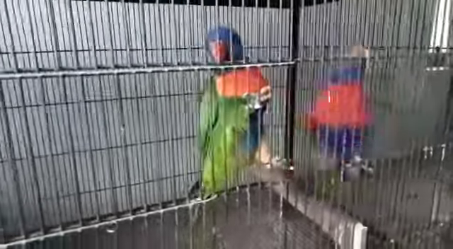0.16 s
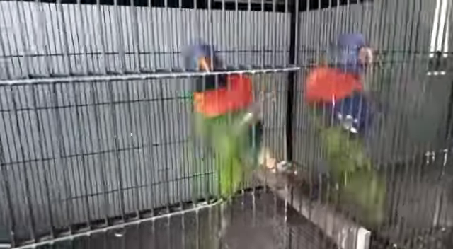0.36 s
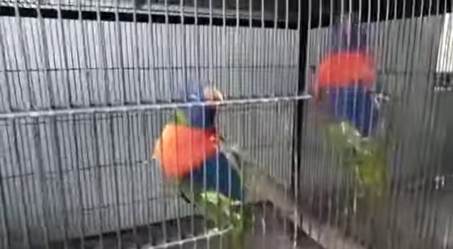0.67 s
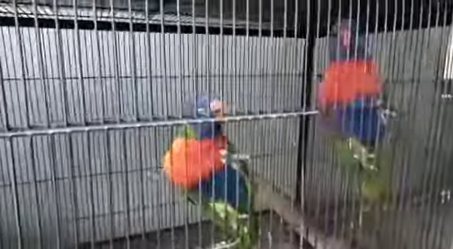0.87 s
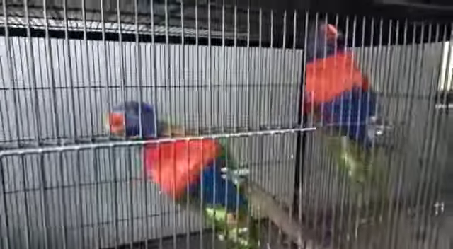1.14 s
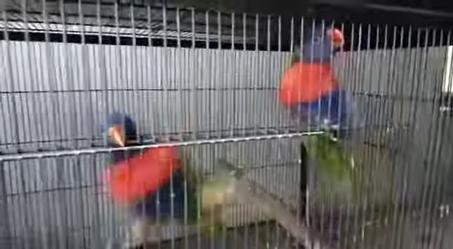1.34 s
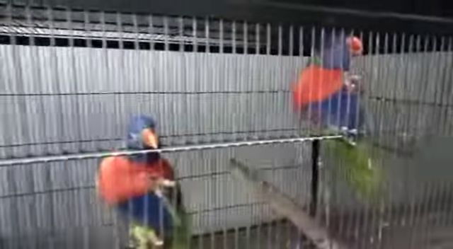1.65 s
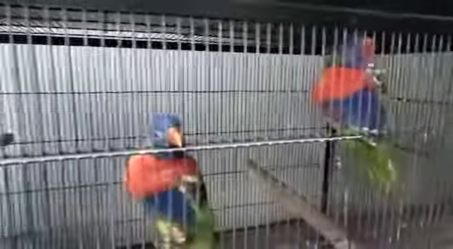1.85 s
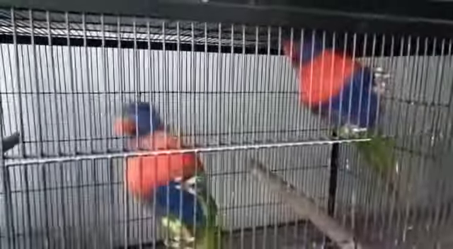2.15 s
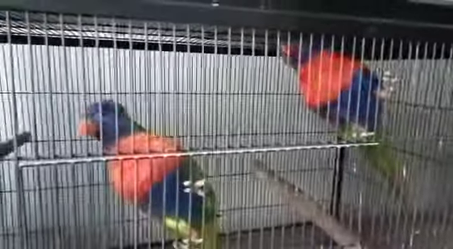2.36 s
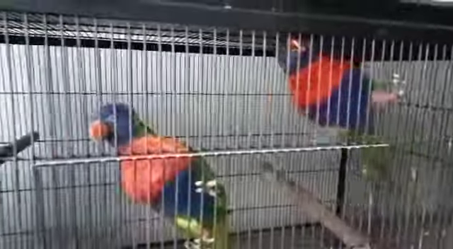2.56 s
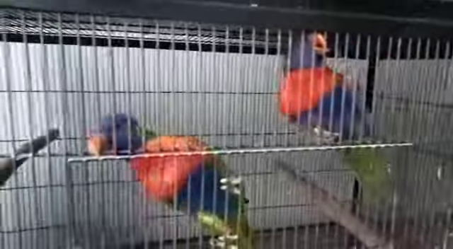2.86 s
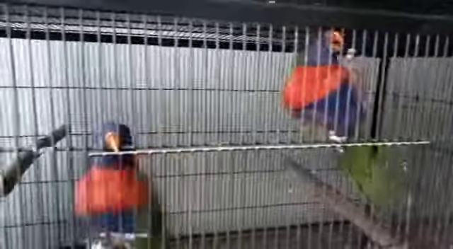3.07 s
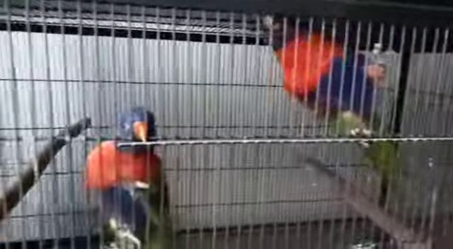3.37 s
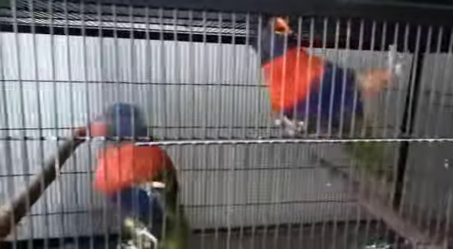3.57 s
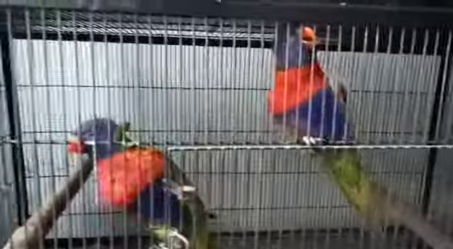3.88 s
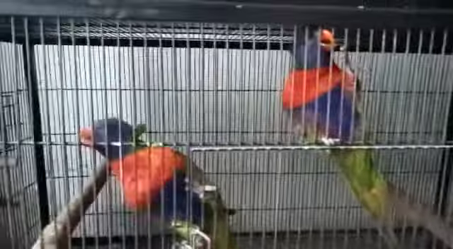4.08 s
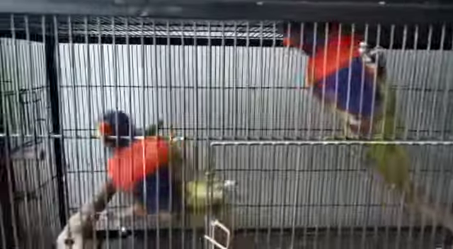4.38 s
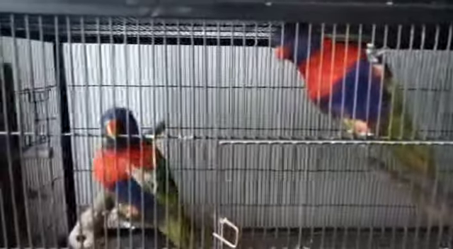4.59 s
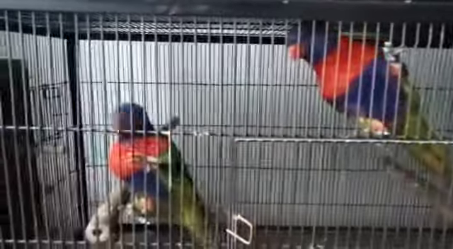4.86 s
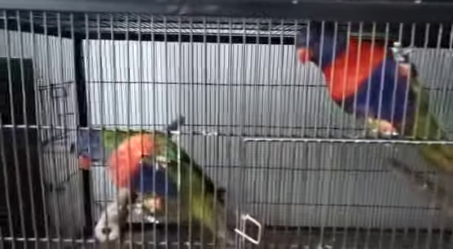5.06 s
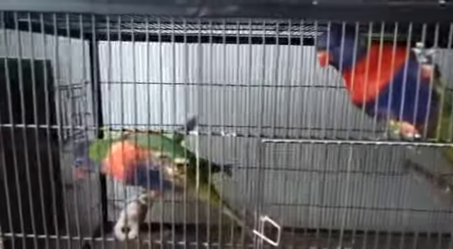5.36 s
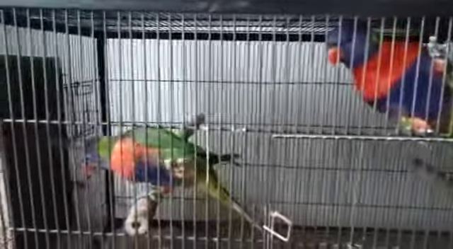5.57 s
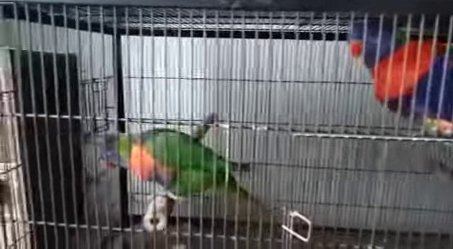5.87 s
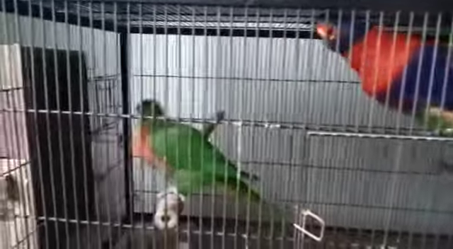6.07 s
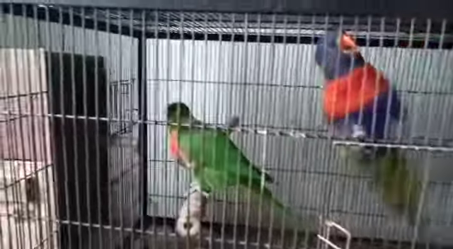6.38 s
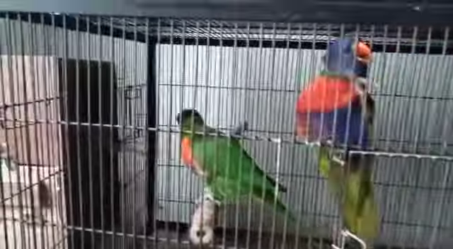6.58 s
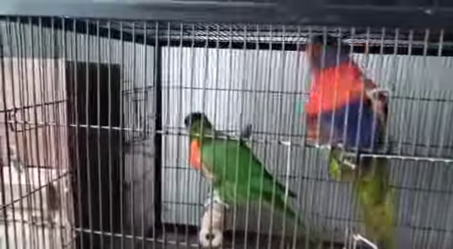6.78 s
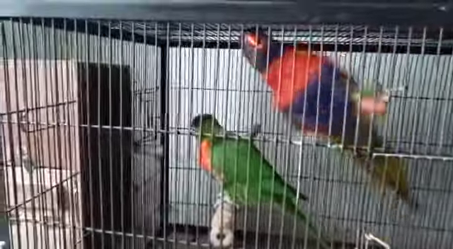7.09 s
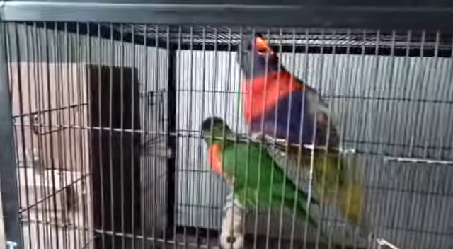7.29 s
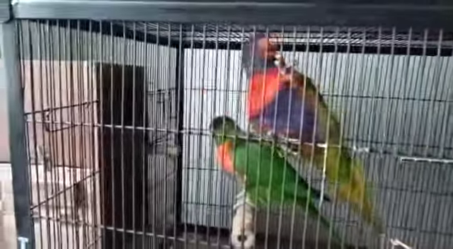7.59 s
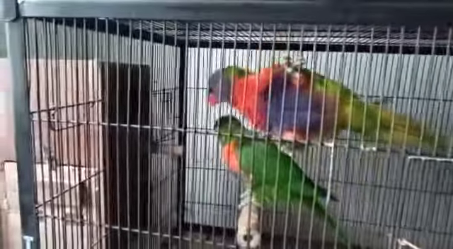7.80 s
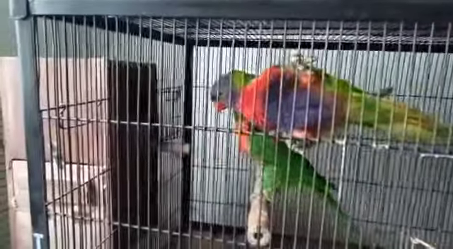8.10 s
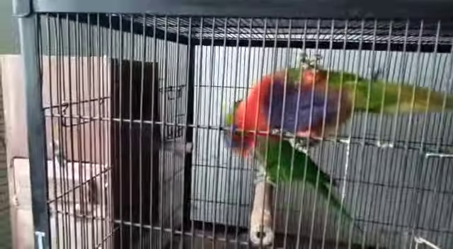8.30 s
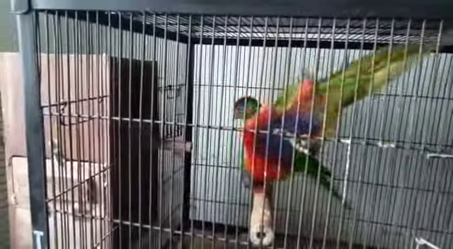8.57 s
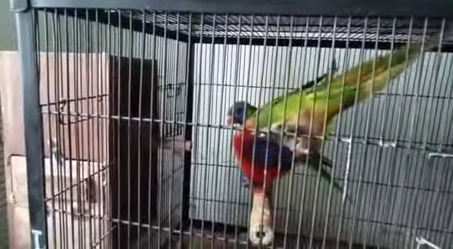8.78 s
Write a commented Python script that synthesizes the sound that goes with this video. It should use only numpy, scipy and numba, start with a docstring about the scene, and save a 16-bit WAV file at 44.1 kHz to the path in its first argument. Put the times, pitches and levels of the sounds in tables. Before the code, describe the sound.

Lorikeets screech harshly in a wire cage, with claws ticking on the mesh and feathers rustling over a faint hum.

```python
"""Lorikeets in a wire aviary with sheet-metal walls. A motor hums far off under a steady rush of air.
Feathers rustle, claws tick on the mesh, then the birds screech, often two at once: each call is a stack
of tones near 2 kHz, trilled and roughened by the syrinx, a bird's voice box. From 2 to 5 s there is
mostly ticking and rustling, then the screeches return, and two weaker calls and a rustle end the scene.
All along, the microphone's gain control pulls the background down under the loud calls."""
import sys
import numpy as np
from scipy import signal
from scipy.fft import rfft, irfft, next_fast_len
from scipy.io import wavfile
from scipy.ndimage import uniform_filter1d
from numba import njit

SR = 44100
rng = np.random.default_rng(int(sys.argv[2]) if len(sys.argv) > 2 else 0)


def dump(signal):
    """Clip the signal to [-1, 1] and save it as 16-bit WAV at the path in sys.argv[1]."""
    limited = np.clip(np.atleast_2d(signal).T, -1, 1)
    pcm = np.round(limited * 32767).astype(np.int16)
    wavfile.write(sys.argv[1], SR, pcm)


N = 394254


def undb(db):
    """Turns decibels into a number to multiply by."""
    return 10 ** (np.asarray(db) / 20)


def unit(x):
    """Scales a signal to an average (rms) size of 1."""
    return x / np.sqrt(np.mean(x ** 2))


def colour(table, hz):
    """Looks up the gain at hz in a table of frequency_hz, level_db."""
    table_hz, table_db = np.array(table).T
    return undb(np.interp(np.log(hz + 1), np.log(table_hz), table_db))


def noise(table, size):
    """Noise of rms 1, shaped by a table of frequency_hz, level_db."""
    n = next_fast_len(size)
    spectrum = rfft(rng.standard_normal(n)) * colour(table, np.arange(n // 2 + 1) * SR / n)
    return unit(irfft(spectrum, n)[:size])


def wander(rate_hz, size):
    """A smooth random wobble of rms 1."""
    width = int(SR / rate_hz)
    return unit(uniform_filter1d(uniform_filter1d(rng.standard_normal(size), width), width))


def add(out, start_s, x):
    """Mixes x into out from start_s on."""
    i = int(start_s * SR)
    out[i:i + len(x)] += x[:N - i]


# The tone of the distant rush: frequency_hz, level_db
AIR_TONE = [(15, -63), (25, -56), (63, -20), (242, -8.5), (293, -11), (427, -7.5), (734, -12.5),
            (863, -10.5), (1520, -19.5), (1940, -18.5), (3430, -23), (4870, -42.5), (7110, -40),
            (16000, -52)]
def air():
    """A soft, distant rush that swells a little."""
    return undb(-44.5 + 0.64 * wander(0.23, N)) * noise(AIR_TONE, N)


# The motor's tones: pitch_hz, level_db, drift_hz
MOTOR_TONES = [(428.4, -53, 3.98), (613, -60.5, 6.8), (847, -50.5, 2.07), (1290, -62, 7.3)]
def motor():
    """A far-off motor hums, each tone wavering in pitch and loudness."""
    out = np.zeros(N)
    for pitch_hz, level_db, drift_hz in MOTOR_TONES:
        level = undb(level_db + 2 * wander(10, N))
        hz = pitch_hz + drift_hz * wander(15.2, N)
        out += np.sqrt(2) * level * np.sin(np.cumsum(2 * np.pi * hz / SR))
    return out


# Stirs of feathers and feet: peak_s, level_db, fall_s (time to fade by 20 dB)
STIRS = [(0.0, -40, .14), (0.248, -43.5, 0.2), (2.1, -45.5, 0.29), (2.71, -53.5, .5), (2.97, -52, 0.1),
         (3.16, -42.5, 0.12), (3.32, -42, 0.16), (3.7, -38.5, 0.28), (3.82, -39, 0.17), (4.02, -40.5, 0.09),
         (4.58, -57.5, 0.66), (4.95, -57, .1), (6.55, -44.5, 0.54), (7.613, -52, 0.05), (8.322, -55, .5),
         (8.819, -36, 0.28), (8.92, -32.5, 0.05)]
def rustle():
    """Feathers and feet make a grainy hiss; each stir rises twice as fast as it fades."""
    hiss = noise([(800, -10.5), (3200, 7.5), (5100, -9), (7200, 4), (10000, -17), (15000, -13)], N)
    grain = undb(2 * wander(55, N))
    t = np.arange(N) / SR
    level = sum(undb(level_db - 20 * np.maximum(2 * (peak_s - t), t - peak_s) / fall_s)
                for peak_s, level_db, fall_s in STIRS)
    return hiss * grain * level


# The tones of one ringing wire: multiple (of wire_hz), level_db
WIRE_TONES = [(.58, -13), (1, -6.5), (1.27, -5), (1.5, -1.5), (2.129, 1.5), (2.6, -5.5), (2.73, 11.5)]
# Claws and beaks hitting the mesh: start_s, level_db, ring_s, wire_hz, ring_db (added to level_db)
CLAW_TICKS = [(0.148, -27.5, 0.29, 6470, -24), (0.2085, -31, 0.091, 6320, -24),
              (0.2399, -42, .15, 6320, -24), (2.081, -74, .2, 6030, -28), (2.3915, -41, .14, 5960, -27),
              (2.5498, -30, 0.24, 6100, -29), (2.6462, -37.5, .35, 5600, -2),
              (2.715, -31.5, 0.44, 6320, -18), (2.9682, -35, .15, 6170, -20), (3.0894, -42, .15, 5970, -16),
              (3.142, -29, .2, 6200, -28), (3.2995, -31, 0.13, 5970, -26), (3.395, -36, 0.16, 6060, -13),
              (3.59, -36, 0.16, 5800, -15), (3.6565, -29, 0.39, 6470, -18), (3.784, -16, .2, 6400, -23),
              (3.8503, -29, .15, 6410, -16), (3.8985, -18, .15, 6700, -17), (4.2482, -40, 0.43, 5330, -20),
              (4.3974, -40, 0.25, 6290, -18), (4.476, -33.5, 0.97, 5730, -15),
              (4.539, -27.5, 0.33, 6490, -28), (4.952, -45, .15, 6430, -24), (7.603, -43, .15, 6270, -17),
              (8.184, -43.5, .14, 6100, -17.5)]
def mesh_ticks():
    """Each hit makes a crack, then the wire rings and the mesh rattles."""
    out, t = np.zeros(N), np.arange(SR // 2) / SR
    rattle_tone = [(1500, -22), (3500, 8.5), (5100, -7), (7200, 15.5), (11000, -8), (15000, 6)]
    for start_s, level_db, ring_s, wire_hz, ring_db in CLAW_TICKS:
        ring = 0
        for multiple, tone_db in WIRE_TONES:
            hz = min(multiple * wire_hz, 15600)
            ring += undb(tone_db + 4 * wander(80, len(t))) * np.sin(2 * np.pi * hz * t)
        rattle = noise(rattle_tone, len(t))
        crack = .5 * np.exp(-t / 0.00054) * rattle
        tail = undb(-60 * t / ring_s) * (undb(ring_db) * unit(ring) + 0.23 * rattle)
        add(out, start_s, undb(level_db) * (crack + tail))
    return out


# The tone of the calls as heard through the microphone, bright near 3-4 and 7 kHz, hollow near 5 kHz:
# frequency_hz, gain_db
CALL_TONE = [(500, -51), (1200, -11), (2100, -4.5), (3000, 3.5), (4000, 0.5), (5100, -14.5), (6300, -8.5),
             (7400, 0), (9000, -21), (10500, -21.5), (12300, -33), (15000, -23), (16500, -41.5)]
def syrinx(hz, rough, half_db, breath_db, tilt_db):
    """The voice box buzzes with a stack of tones; a hoarse one adds flutter and breath."""
    phase = np.cumsum(np.pi * hz / SR)  # runs at half the pitch, so k = 2 is the pitch itself
    voice, power = 0, 0
    for k in range(1, 24):
        tone_hz = k * hz / 2
        gain = colour(CALL_TONE, tone_hz) * (tone_hz < .38 * SR) * undb(tilt_db * np.log2(k / 4))
        gain *= undb(3.5 * (k == 4))  # the open beak favours twice the pitch
        # closing harder every second cycle adds the odd, in-between tones
        gain *= undb(half_db * (1.5 - rough / 2) * (k % 2))
        flutter = undb(5.5 * rough * wander(470, len(hz)))
        slip = .6 * np.sqrt(k) * rough * wander(580, len(hz))  # high tones slip out of step more
        voice += gain * flutter * np.cos(k * phase + k * k + slip)
        power += gain ** 2 / 2
    breath = undb(breath_db) * rough ** 2 * noise(CALL_TONE, len(hz))
    return unit(voice / np.sqrt(power)) + breath


def beak_puffs(beats):
    """Gusts from the beak hit the microphone as dull thumps, one a beat, each its own size."""
    beat = beats % 1
    strength = undb(3.8 * rng.standard_normal(64))[beats.astype(int)]
    gust = strength * (0.13 + 4 * beat * np.exp(1 - beat / 0.085))
    gust *= 1 + 4.3 * noise([(100, -1.5), (300, -7), (900, -10.5), (2500, -5.5)], len(beats))
    return unit(signal.sosfilt(signal.butter(3, [72.4, 900], "bandpass", fs=SR, output="sos"), gust))


LEAD_RISE_HZ_PER_S, LEAD_RISE_DB, JUMP_HZ_PER_S, SHORTEST_JUMP_S = 2300, 6.5, 22000, .012
PUFF_RISE_DB_PER_S, PUFF_FALL_DB_PER_S = 334, 650.5
ATTACK_S, RELEASE_S = 0.011, 0.006
def screech(row, lead_rough, body_rough, lead_throb):
    """One call: a hoarse lead-in jumps to the main body, swells and fades. Returns voice and puffs."""
    lead_s, swell_s, fade_s, lead_hz, first_hz, middle_hz, last_hz = row[:7]
    lead_db, first_db, crest_db, last_db, puff_db = row[7:12]
    trill_hz, swing, body_throb, half_db, breath_db, tilt_db = row[12:]
    crest_s = lead_s + swell_s
    end_s = crest_s + fade_s
    t = np.arange(0, end_s, 1 / SR)

    rising_hz = lead_hz + LEAD_RISE_HZ_PER_S * np.minimum(t, lead_s)
    jump_s = max(abs(first_hz - rising_hz[-1]) / JUMP_HZ_PER_S, SHORTEST_JUMP_S)
    body_s = lead_s + min(jump_s, .9 * swell_s)
    jump = np.interp(t, [lead_s, body_s], [0, 1])  # 0 in the lead-in, 1 in the body
    progress = np.clip((t - body_s) / (end_s - body_s), 0, 1)
    arch = 1 - abs(2 * progress - 1) ** 3  # a flat-topped curve
    body_hz = first_hz + (last_hz - first_hz) * progress + (middle_hz - (first_hz + last_hz) / 2) * arch
    hz = (1 - jump) * rising_hz + jump * body_hz
    hz *= 1 - .08 * np.clip(1 - (end_s - t) / .018, 0, 1)  # the pitch sags as the air runs out

    db = np.interp(t, [0, lead_s, body_s, crest_s, end_s],
                   [lead_db - LEAD_RISE_DB, lead_db, first_db, crest_db, last_db])
    puff_db -= np.maximum(PUFF_RISE_DB_PER_S * (crest_s - t), PUFF_FALL_DB_PER_S * (t - crest_s))
    hz, db, puff_db = (uniform_filter1d(curve, 400, mode="nearest") for curve in (hz, db, puff_db))

    # every beat of the trill opens the airflow and sweeps the pitch up
    beats = np.cumsum(trill_hz * (1 + 0.057 * wander(40, len(t))) / SR)
    beat = beats % 1
    throb = lead_throb + (body_throb - lead_throb) * jump
    sharpness = 2.5 - 1.5 * jump
    airflow = (1 - throb * np.cos(np.pi * beat) ** 2) ** sharpness
    rough = lead_rough + (body_rough - lead_rough) * jump
    jitter = .035 * rough ** 2 * wander(900, len(t))
    hz *= 1 + swing * (2 * beat - 1) + jitter

    voice = undb(db) * unit(airflow) * syrinx(hz, rough, half_db, breath_db, tilt_db)
    voice_fade = np.clip(np.minimum(t / ATTACK_S, (end_s - t) / RELEASE_S), 0, 1)
    puff_fade = np.clip(np.minimum(t, end_s - t) / .02, 0, 1) ** 2
    return voice_fade * voice, puff_fade * undb(puff_db) * beak_puffs(beats)


# The calls, one a row: start_s, lead_s, swell_s, fade_s, lead_hz, first_hz, middle_hz, last_hz,
# lead_db, first_db, crest_db, last_db, puff_db, trill_hz, swing (share of the pitch),
# body_throb (0 steady to 1 pulsing), half_db (in-between tones) and breath_db (both at full roughness),
# tilt_db (per octave). "Lead" is the lead-in; "first", "middle" and "last" belong to the body.
CALLS = [ (0.384, 0.023, 0.16, 0.029, 1375, 1952, 1912, 1948, -6, -6.5, -3.5, -14, -23, 68.8, 0.053, 0.1, -12.5, -17, 2.5),
         (0.6, 0.07, 0.035, 0.028, 1438, 1745, 1793, 1740, -14, -7.5, -9.5, -21, -74, 71.5, 0.0039, 0.26, -23, -17, 0),
         (0.808, 0.041, .018, 0.023, 1239, 1346, 1353, 1360, -11, -11, -11.5, -15, -45.5, 79, 0.047, .6, -16, 8, .5),
         (0.89, 0.013, 0.071, 0.02, 1945, 2060, 2047, 2173, -5.5, -14, -10, -23, -23.5, 69, 0.01, .2, -9.5, -11, 3.5),
         (0.895, 0.042, 0.031, 0.019, 1567, 1753, 1818, 1855, -6, -0.5, -3.5, -9.5, -20.5, 59.2, 0.0038, .33, -28, -7, 4.5),
         (1.0, .002, .018, 0.029, 2520, 2365, 2043, 1860, -10, -6, -9.5, -17.5, -33, 67.8, .0034, .097, -26.5, -20.5, 6),
         (1.075, 0.056, .085, .02, 1507, 2087, 2164, 1993, -9, -4, -5.5, -0.5, -12, 69.15, 0.01, 0, -28, 0.5, 5),
         (1.343, .052, .026, 0.16, 3008, 3143, 3062, 3090, -4, -7.5, -4.5, -20.5, -47, 66.2, 0.003, .4, -31, -0.5, -1.5),
         (1.43, 0.028, .11, 0.019, 2005, 2241, 2165, 2073, -6.5, -9, -7, -9, -35.5, 98.7, 0.041, 0.48, -10, -23, 3.5),
         (1.578, 0.0059, 0.16, 0.078, 2103, 2284, 2082, 1905, -1, -3.5, -3, -10, 1.5, 97.6, 0.028, 0.34, -9.5, -1, 3.5),
         (3.66, 0.0077, .148, 0.072, 2525, 2543, 2563, 2573, -37, -40, -33, -40, -42, 61.4, .0023, 0.2, -30, -3, 7.5),
         (3.9, .024, 0.049, 0.084, 2560, 2525, 2530, 2560, -36, -37, -28, -40.5, -51, 60.7, .0023, 0.26, -28, -1, 6.5),
         (5.098, 0.052, 0.029, 0.031, 1256, 1720, 1685, 1636, -17, -13, -9, -15.5, -42, 58.7, 0.033, 0.7, -6, 0, -4.5),
         (5.371, 0.053, 0.091, 0.088, 1568, 2013, 1928, 1806, -7.5, -6, -8, -12.5, -23.5, 63.36, .077, 0.33, -7, -4.5, 3.5),
         (5.699, .046, .114, 0.041, 1462, 1894, 1963, 1905, -13, -4, -1, -8, -9.5, 58.25, .13, 0.7, -10.5, 7, 3.5),
         (5.949, 0.039, .11, 0.0057, 3057, 3114, 3022, 3078, -11.5, -16, -12, -13.5, -43, 69.5, 0.013, 0.6, -9, -19.5, 3),
         (6.015, .004, .09, 0.027, 1132, 2067, 2043, 1980, -8, -6, -2, -17, -20.5, 73.3, 0.012, 0, -23, -11, 2.5),
         (6.19, 0.029, 0.019, 0.16, 1442, 1735, 1773, 1699, -12.5, -11, -11, -16, -55, 74, 0.012, 0.25, -5, -15, 4.5),
         (6.265, .015, 0.049, 0.11, 2330, 2330, 2063, 1943, -16, -19, -14.5, -18.5, -58, 70.3, 0.029, .3, -29, 6.5, -0.5),
         (6.957, 0.051, 0.13, .022, 1401, 2149, 2101, 1947, -5, -2.5, -2.5, -6.5, -23, 126.5, 0.011, 0.2, -8.5, -7.5, 4.5),
         (7.73, 0.038, 0.042, 0.079, 957, 1333, 1414, 1346, -27.5, -27, -17.5, -37, -45, 81.7, 0.082, .06, -11, -0.5, -13),
         (8.78, 0.017, 0.085, 0.076, 993, 1038, 1038, 1046, -37, -37.5, -41, -38, -41, 65.8, .0087, 0, -4, -5, -7),
         ]
# How hoarse each of those calls is: lead_rough, body_rough (0 clear to 1 ragged), lead_throb (0 to 1)
HOARSENESS = [(1, .62, .5), (.85, .2, .6), (.5, .6, .6), (.6, .45, .4), (.7, .2, .4), (.25, .3, .2),
              (1, .27, .6), (.35, .45, .5), (.5, .55, .5), (.9, .47, .5), (.45, .45, .5), (.4, .33, .4),
              (.75, .55, .7), (.85, .6, .2), (.6, .28, 1), (.45, .48, .5), (.5, .22, .3), (.9, .5, .4),
              (.5, .45, .4), (.95, .47, .15), (.7, .8, .2), (.5, .5, .3)]
def lorikeets():
    """The birds call in turn or over each other. Returns voices and puffs of air."""
    voices, puffs = np.zeros(N), np.zeros(N)
    for (start_s, *row), hoarseness in zip(CALLS, HOARSENESS):
        voice, puff = screech(row, *hoarseness)
        add(voices, start_s, voice)
        add(puffs, start_s, puff)
    return voices, puffs


# Faint low tones: start_s, length_s, pitch_hz, level_db (average over the tone)
LOW_TONES = [(3.31, 0.14, 148, -53), (3.49, 0.099, 149, -52), (6.62, 0.087, 241, -48.5)]
def low_tones():
    """Three short, low hoots swell and fade in the background."""
    out = np.zeros(N)
    for start_s, length_s, pitch_hz, level_db in LOW_TONES:
        t = np.arange(0, length_s, 1 / SR)
        swell = 2 * np.sin(np.pi * t / length_s)
        add(out, start_s, undb(level_db) * swell * np.sin(2 * np.pi * pitch_hz * t))
    return out


# Dips caused by the microphone's case: frequency_hz, gain_db
CASE_DIPS = [(1000, 0), (4500, -1), (5100, -3), (5700, -0.5), (10800, -1), (12200, -4), (13500, -1)]
def microphone_case(x):
    """The case around the microphone weakens parts of the treble."""
    n = next_fast_len(N)
    return irfft(rfft(x, n) * colour(CASE_DIPS, np.arange(n // 2 + 1) * SR / n), n)[:N]


BRIGHT_ECHO_S, DULL_ECHO_S, ECHO_GAP_S, ECHO_DB = .4, .42, 0.0051, -6
def wall_echoes(x):
    """The metal walls add dense echoes, the treble dying a little sooner."""
    t = np.arange(SR) / SR
    bright = noise([(5000, -2), (12000, -8)], SR) * undb(-60 * t / BRIGHT_ECHO_S)
    dull = noise([(3000, 21.5), (9000, -31.5)], SR) * undb(-60 * t / DULL_ECHO_S)
    tail = (bright + dull) * (t > ECHO_GAP_S)
    return x + undb(ECHO_DB) * signal.oaconvolve(x, tail / np.sqrt(np.sum(tail ** 2)))[:N]


def scene():
    """All the sounds meet at one microphone, which feeds both channels."""
    voices, puffs = lorikeets()
    echoing = wall_echoes(microphone_case(voices) + mesh_ticks())
    mono = echoing + puffs + rustle() + air() + motor() + low_tones()
    return np.array([mono, mono])


@njit
def follow_level(x, rise_s, fall_s):
    """Tracks how loud x is, rising and falling at separate speeds."""
    out, level = np.empty(len(x)), 0.
    for i in range(len(x)):
        gap = abs(x[i]) - level
        level += gap / (SR * (rise_s if gap > 0 else fall_s))
        out[i] = level
    return out


BASS_CUT_HZ, TOP_CUT_HZ, GAIN_KNEE_DB, GAIN_SLOPE, CEILING = 77, 15800, -20.5, 0.35, .9
def record(dry):
    """Gain control turns loud moments down and recovers slowly; peaks are rounded, bass and top cut."""
    dry = signal.sosfilt(signal.butter(2, BASS_CUT_HZ, "highpass", fs=SR, output="sos"), dry)
    level = follow_level(dry[0], rise_s=0.0029, fall_s=.14)
    gain = (1 + level / undb(GAIN_KNEE_DB)) ** -GAIN_SLOPE
    rounded = CEILING * np.tanh(dry * gain / CEILING)
    return signal.sosfilt(signal.ellip(10, .2, 70, TOP_CUT_HZ, fs=SR, output="sos"), rounded)


dry = scene()
out = record(dry)
dump(out)
```